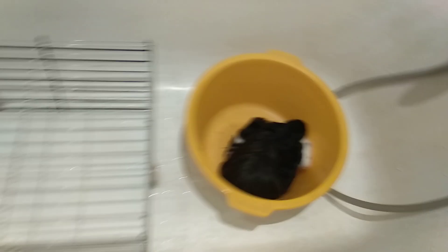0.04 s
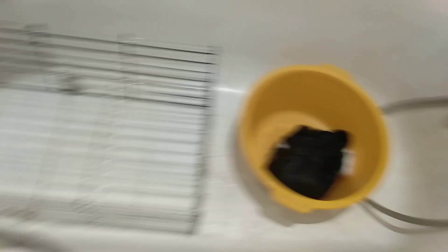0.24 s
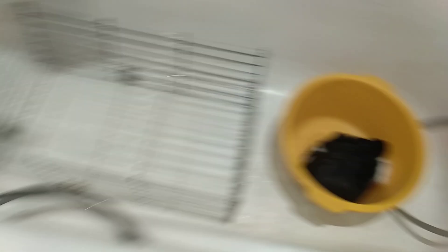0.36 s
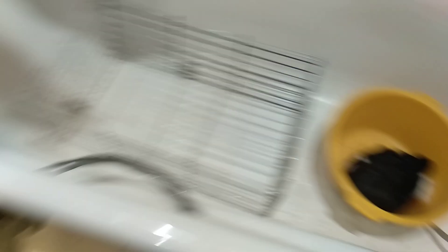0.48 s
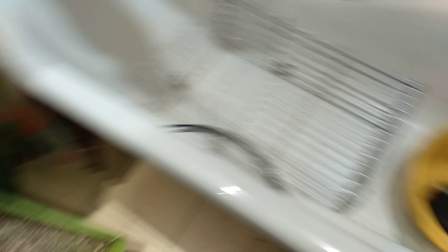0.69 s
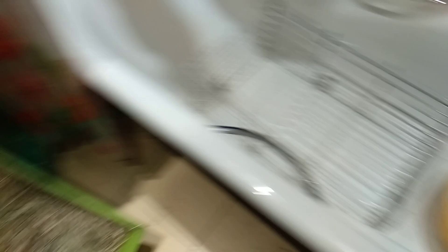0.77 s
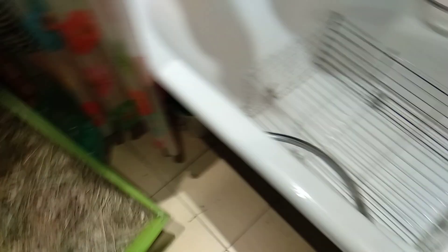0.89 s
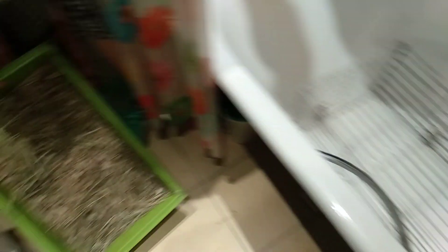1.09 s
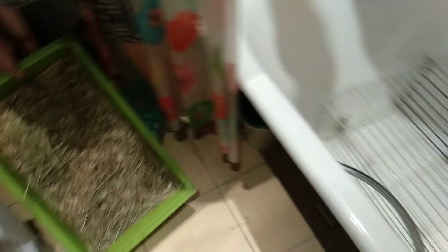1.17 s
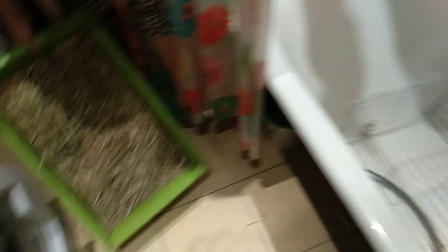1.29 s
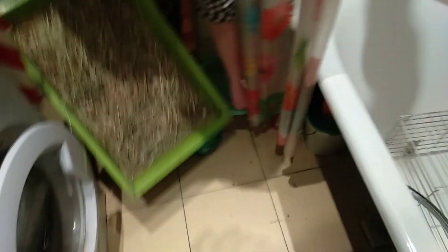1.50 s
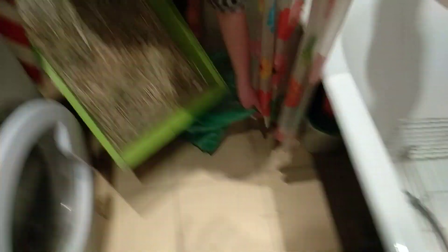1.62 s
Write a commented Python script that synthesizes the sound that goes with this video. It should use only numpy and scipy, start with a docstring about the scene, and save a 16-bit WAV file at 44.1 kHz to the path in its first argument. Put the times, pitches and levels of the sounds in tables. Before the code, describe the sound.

Something groans along a hollow bathtub and knocks it, over soft clothing rustle.

```python
"""A short scuff and a low handling rumble open on a small tiled bathroom, cloth and fingers rustling close by.
At 0.2 s something rubs along a hollow bathtub: a low, juddering stick-slip groan that locks into a note.
Just past half a second it bumps the tub three times in quick succession, and the room booms.
The groan dies away by 0.9 s; the rustle, mostly on the right, carries on over a soft swish of clothing."""
import sys
import numpy as np
from scipy import signal
from scipy.fft import rfft, irfft
from scipy.io import wavfile
from scipy.ndimage import uniform_filter1d

SR = 44100
rng = np.random.default_rng(int(sys.argv[2]) if len(sys.argv) > 2 else 0)


def master_out(mix):
    """Clip the mix to full scale and print it as 16-bit PCM to the path in sys.argv[1]."""
    frames = np.transpose(np.atleast_2d(mix))
    ceiling = np.clip(frames, -1, 1)
    pcm = np.round(ceiling * 32767).astype(np.int16)
    wavfile.write(sys.argv[1], SR, pcm)


N = 72765

# ringing modes of the hollow tub (frequency [Hz], relative level [dB], t60 [s])
TUB_MODES = [(254.1, -9, 0.33), (278.5, -5.5, 0.17), (318, 0, 0.38), (373.7, 3.5, 0.27), (397.4, -3, 0.55),
             (428.5, -8, 0.4), (470, -9, 0.13), (498, -2, 0.28), (518, 1, 0.54), (527, -17, 0.21),
             (567, -15, 0.3)]


def rub():
    """Friction along the tub: a wide groan, a centred note and a rasp that opens under firm contact."""
    # swell of the tub's three resonance bands (time [s], lower [dB], middle [dB], upper [dB])
    band_levels = [(.15,-56,-62,-65), (.19,-49,-42.5,-51), (.21,-38.5,-35.5,-51), (.25,-38.5,-37.5,-42.5),
                   (.31,-40,-35,-36), (.35,-34,-27,-36.5), (.378,-33,-33.5,-33), (.41,-30.5,-30.5,-35),
                   (.445,-26,-28.5,-29), (.495,-40,-33.5,-31.5), (.538,-32,-31,-33), (.555,-25.5,-39,-22.5),
                   (.62,-32,-33.5,-27), (.648,-34,-29.5,-27), (.68,-38,-44,-24.5), (.72,-41.5,-34.5,-35.5),
                   (.746,-37,-35.5,-34.5), (.775,-46,-37.5,-46.5), (.805,-44,-40.5,-37.5),
                   (.835,-50,-44,-45.5), (.85,-61,-47,-54), (.89,-66,-53,-58), (.95,-80,-77,-80)]
    # tone of the contact rasp (frequency [Hz], relative density [dB])
    rasp_colour = [(20, -50), (55, -29), (90, -10.5), (160, -3), (620, 0.5), (800, 0), (1000, -4),
                   (1250, -3), (1450, -24), (2500, -35)]
    side_db, rasp_db, rasp_follow = -11.5, -29.5, 0.45
    contact_from_db, contact_range_db = -40.5, 7
    gains = undb([curve(band_levels, column) for column in (1, 2, 3)])
    mid = groan(gains) + note()
    side = undb(side_db) * groan(gains)
    force_db = 10 * np.log10(np.sum(gains ** 2, axis=0))
    rasp = colour(noise(), rasp_colour) * undb(rasp_db + rasp_follow * force_db)
    contact = np.clip((force_db - contact_from_db) / contact_range_db, 0, 1)
    return np.array([mid + side, mid - side]) + rasp * contact


def groan(gains):
    """Stick-slip drives the tub; the balance of its resonances shifts as the contact slides."""
    # edges of the lower, middle and upper resonance bands (frequency [Hz])
    edges = [241.6, 321.3, 451, 605]
    slips = grains(per_s=600, scatter_db=4.5)
    wall = unit(ring(slips, TUB_MODES)) + undb(-10) * unit(hollow_wall(slips))
    sound = np.zeros(N)
    for gain, low_hz, high_hz in zip(gains, edges, edges[1:]):
        band = signal.sosfiltfilt(butter(4, [low_hz, high_hz], "bandpass"), wall)
        power = uniform_filter1d(band ** 2, size=2800)  # about a sixteenth of a second
        sound += gain * band / np.sqrt(power + 1e-12)  # evened out, so the gain shapes the swell
    return sound


def note():
    """Regular stick-slip sings around the tub's strongest resonance, bending with the pressure."""
    # bend and swell of the note (time [s], pitch [Hz], relative level [dB])
    contour = [(.18,350,-76), (.206,350.6,-29.5), (.25,367,-26), (.285,388,-30.5), (.32,408.6,-34),
               (.355,375.4,-48), (.39,365.4,-32), (.42,365.6,-29.5), (.5,366.7,-26.5), (.55,370.7,-21.5),
               (.59,359.1,-30), (.625,350,-24.5), (.66,352,-60), (.7,349,-90)]
    pitch_waver, shake_db = 0.01, 1
    hz = curve(contour) * (1 + pitch_waver * waver(per_s=60))
    level_db = curve(contour, column=2) - 1 + shake_db * waver(per_s=60)
    return np.sqrt(2) * np.sin(2 * np.pi * np.cumsum(hz) / SR) * undb(level_db)


def bumps():
    """Soft blows on the tub: a hollow knock, its ring, a clack, a thud and a lingering room boom."""
    # the three blows (time [s], strength [dB])
    hits = [(.5461, -8), (.5656, -10.5), (.5903, -15.5)]
    # low room modes the blows wake (frequency [Hz], relative level [dB], t60 [s])
    boom_modes = [(72.3, 2, 0.73), (95.17, -3.5, 0.17), (119.4, 4, 0.08), (168.1, -0.5, 0.12)]
    # brief higher ring of a blow (frequency [Hz], relative level [dB], t60 [s])
    clack_modes = [(973, 5, 0.06), (1021, 5.5, 0.15), (1170, 4, 0.13), (1313, -7, .1)]
    # tone of the dull thud (frequency [Hz], relative density [dB])
    thud_colour = [(20, -59), (55, -48), (90, -14), (160, 6), (220, -8), (700, -11), (850, -5), (1030, 3),
                   (1400, -21), (3000, -21)]
    blows = np.zeros(N)
    for time_s, db in hits:
        blows[int(time_s * SR)] += undb(db)

    def peaked(x, db):
        """Set a layer's peak relative to the hardest blow."""
        return undb(db) * blows.max() * x / np.abs(x).max()

    knock = peaked(hollow_wall(blows), db=0)
    tub_ring = peaked(ring(blows, TUB_MODES), db=-16.5)
    clack = peaked(ring(blows, clack_modes), db=-25.5)
    late_blows = np.roll(blows, int(0.0049 * SR))
    boom = peaked(ring(late_blows, boom_modes, rise_s=0.011), db=-29)  # the room takes a moment to fill
    burst = colour(noise(), thud_colour) * decay(np.arange(N) / SR, t60_s=0.1)
    thud = undb(-24.5) * signal.fftconvolve(blows[None], burst, axes=1)[:, :N]
    return knock + tub_ring + clack + boom + thud


def hollow_wall(x):
    """The short, hollow response of the tub wall."""
    return signal.sosfilt(butter(4, [257, 514], "bandpass"), x)


def rustle():
    """Dense fibre slips of cloth and fingers close by, louder and brighter on the right."""
    # swell of the rustle (time [s], relative level [dB])
    levels = [(0,-47), (.05,-45.5), (.11,-45), (.15,-40.5), (.266,-44), (.36,-45.5), (.425,-42),
              (.70,-43.5), (.745,-46), (.83,-46.5), (.90,-50), (.97,-48), (1.005,-44), (1.09,-42.5),
              (1.16,-46.5), (1.19,-44.5), (1.225,-42.5), (1.32,-46), (1.368,-43.5), (1.402,-46.5),
              (1.42,-43.5), (1.525,-40.5), (1.65,-40.5)]
    # its tone on each side (frequency [Hz], relative density [dB])
    left_colour = [(400, -34), (1300, -12), (2100, -1), (3500, -10), (6000, 0), (8700, 0.5), (10500, -2),
                   (12500, -7.5), (16000, -8.5)]
    right_colour = [(400, -9), (1500, -15), (3500, -12), (6000, -3.5), (8000, 0), (9600, 0.5), (12500, -4),
                    (16000, -9)]
    catch_db, firm_db, brighten = 0.64, -47.5, 0.69
    left = undb(-2) * colour(grains(per_s=14000, scatter_db=3.5), left_colour)
    right = undb(6) * colour(grains(per_s=14000, scatter_db=3.5), right_colour)
    fibres = np.array([left, right])
    level_db = curve(levels) + catch_db * waver(per_s=30.06)  # the cloth catches and slides unevenly
    treble = signal.sosfiltfilt(butter(2, 9000, "high"), fibres)
    treble_gain = undb(brighten * (level_db - firm_db))  # firmer rubbing is brighter
    return (fibres + treble * (treble_gain - 1)) * undb(level_db)


def swish():
    """The softer, duller swish of moving clothing, spread by the tiles and leaning left."""
    # swell of the swish (time [s], relative level [dB])
    levels = [(0, -55.5), (.2, -47), (.3, -55), (.45, -49.5), (.6, -49), (.69, -45), (.74, -49),
              (.865, -48.5), (.91, -58.5), (.97, -61), (1.06, -49.5), (1.15, -54.5), (1.42, -51),
              (1.56, -47.5), (1.65, -48.5)]
    # its tone (frequency [Hz], relative density [dB])
    tone = [(150, -63), (280, -12), (550, 2), (1200, -5), (1700, 1.5), (2300, 5), (3300, 2.5), (5000, 1),
            (9000, -31)]
    return colour(tiled_noise(), tone) * undb(curve(levels) + 3) * pan(left_db=4)


def scuff():
    """A short midrange scuff at the start, spread by the tiles and leaning left."""
    # swell of the scuff (time [s], relative level [dB])
    levels = [(0, -45.5), (.04, -48), (.11, -43), (.16, -42.5), (.21, -55), (.3, -59)]
    # its tone (frequency [Hz], relative density [dB])
    tone = [(200, -7), (550, -13), (740, 5.5), (1000, -0.5), (1250, -1.5), (1430, 4), (1530, -4.5),
            (1650, 1), (1850, 2.5), (2300, 1.5), (3200, -7.5), (6000, -12.5)]
    return colour(tiled_noise(), tone) * undb(curve(levels) + 6) * pan(left_db=4)


def tiled_noise():
    """Noise with dense reflections off the tiled walls, different on each side."""
    direct = rng.standard_normal((2, N))
    t = np.arange(SR // 3) / SR
    echoes = rng.standard_normal((2, len(t))) * decay(t, t60_s=0.19)
    echoes /= np.sqrt(np.sum(echoes ** 2, axis=1, keepdims=True))
    return unit(direct + undb(1) * signal.fftconvolve(direct, echoes, axes=1)[:, :N])


def rumble():
    """Low handling rumble over the steady air of the room."""
    # swell of the handling rumble (time [s], level [dB])
    levels = [(0, -50), (.06, -46), (.18, -51.5), (.5, -86), (.9, -61), (1.3, -63.5), (1.5, -54),
              (1.65, -55.5)]
    # tones of the handling and of the room air (frequency [Hz], relative density [dB])
    handling_colour = [(20, -48), (47, -18), (75, 5), (190, 2.5), (270, 8.5), (350, 4), (470, -8),
                       (900, -50)]
    air_colour = [(20, -38), (47, -26), (70, 1), (120, 7), (200, 1.5), (370, 7), (520, 7), (700, -47),
                  (1200, -35), (4000, -44), (15000, -44)]
    handling = colour(noise(), handling_colour) * undb(curve(levels))
    air = colour(noise(), air_colour) * undb(-58)
    return handling + air


def grains(per_s, scatter_db):
    """Randomly timed tiny slips of uneven size."""
    slips = (rng.random(N) < per_s / SR) * rng.choice([-1, 1], N)
    return slips * undb(scatter_db * rng.standard_normal(N))


def ring(x, modes, rise_s=0):
    """Drive a set of decaying modes, which may swell in gradually."""
    t = np.arange(SR // 2) / SR
    response = sum(undb(db) / np.sqrt(t60) * np.sin(2 * np.pi * hz * t) * decay(t, t60)
                   for hz, db, t60 in modes)
    swell = np.minimum(t / (rise_s + 1 / SR), 1)
    return signal.fftconvolve(x, response * swell)[:N]


def noise():
    """Stereo noise, alike in both ears in the bass and unrelated in the treble."""
    wide_hz = 1230
    mid, side = rng.standard_normal((2, N))
    width = np.clip(np.arange(N // 2 + 1) * SR / N / wide_hz, .15, 1)
    side = irfft(rfft(side) * width, N)
    return np.array([mid + side, mid - side])


def colour(x, points):
    """Shape a signal with an EQ curve of (Hz, dB) points, at rms 1."""
    hz, db = np.array(points).T
    bin_hz = np.maximum(np.arange(N + 1) * SR / (2 * N), 1)
    eq = undb(np.interp(np.log(bin_hz), np.log(hz), db))
    return unit(irfft(rfft(x, 2 * N) * eq)[..., :N])


def waver(per_s):
    """A smooth random wobble at rms 1."""
    count = int(N / SR * per_s) + 2
    return unit(signal.resample(rng.standard_normal(count), N))


def curve(rows, column=1):
    """One column of a table, joined by straight lines in time."""
    rows = np.array(rows)
    return np.interp(np.arange(N) / SR, rows[:, 0], rows[:, column])


def decay(t, t60_s):
    """A tail that falls 60 dB in t60_s."""
    return np.exp(-np.log(1000) * t / t60_s)


def butter(order, hz, kind):
    """Butterworth filter sections."""
    return signal.butter(order, hz, kind, fs=SR, output="sos")


def pan(left_db):
    """Channel gains for a left-minus-right level."""
    return undb(np.array([[left_db], [-left_db]]) / 2)


def undb(db):
    """Decibels to gain."""
    return 10 ** (np.asarray(db) / 20)


def unit(x):
    """Scale to rms 1."""
    return x / np.sqrt(np.mean(x ** 2))


def scene():
    """The stereo mix: tub in front, cloth and room around it."""
    return rub() + bumps() + rustle() + swish() + scuff() + rumble()


def record(dry):
    """Roll off the bass below 71 Hz and cut the top steeply at 15750 Hz."""
    thin = signal.sosfilt(butter(2, 71, "high"), dry)
    return signal.sosfilt(signal.ellip(10, .2, 80, 15750, fs=SR, output="sos"), thin)


dry = scene()
out = record(dry)
master_out(out)
```